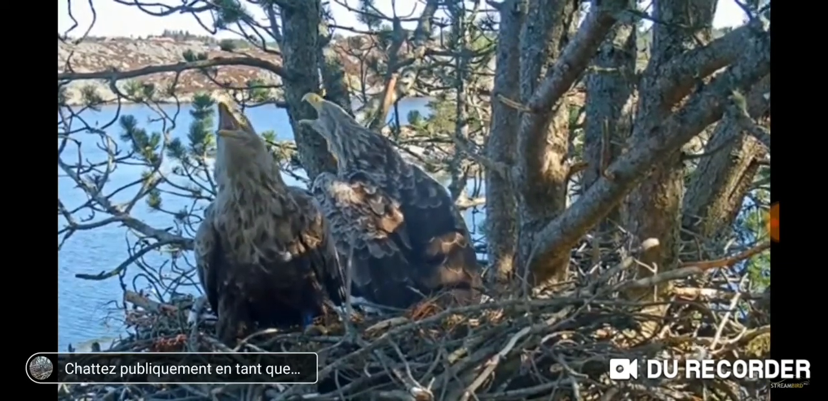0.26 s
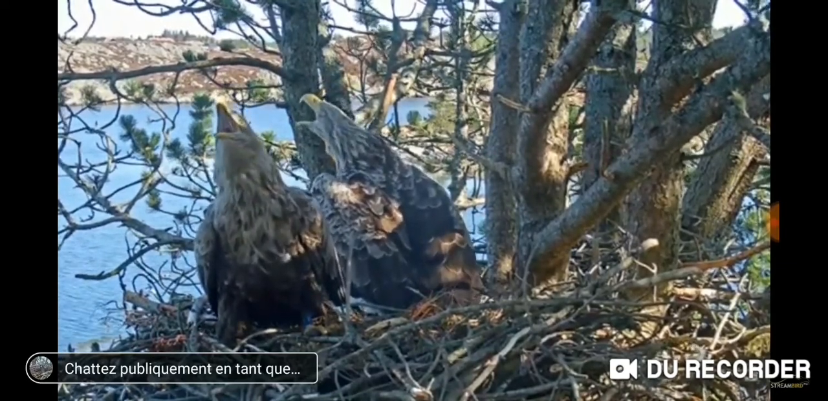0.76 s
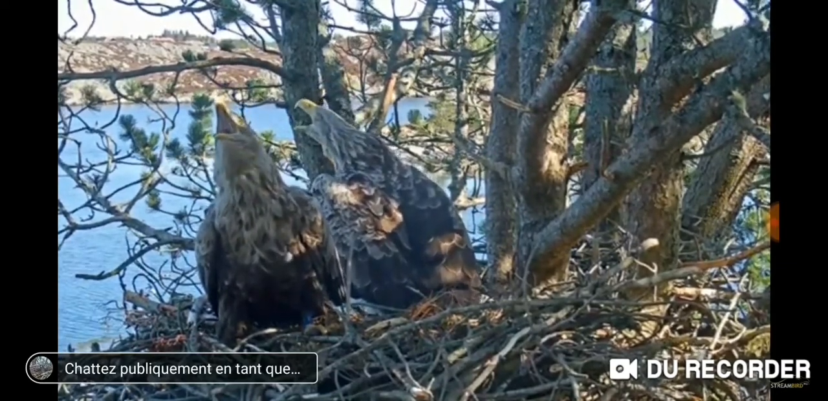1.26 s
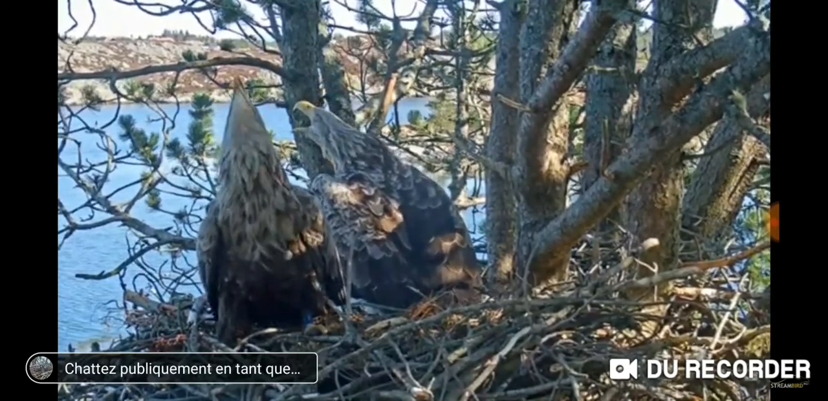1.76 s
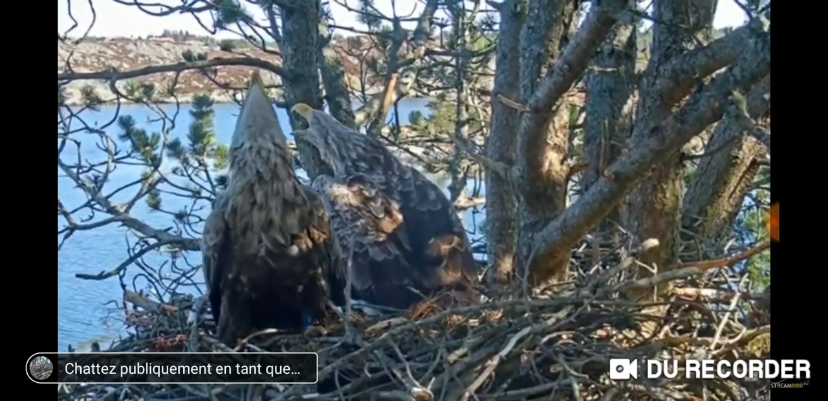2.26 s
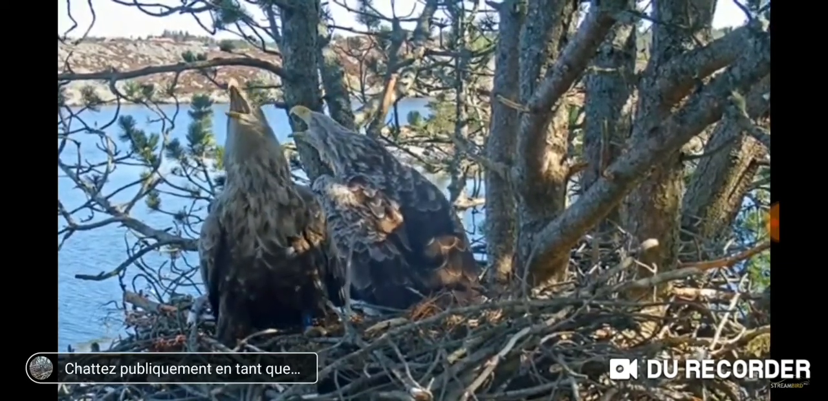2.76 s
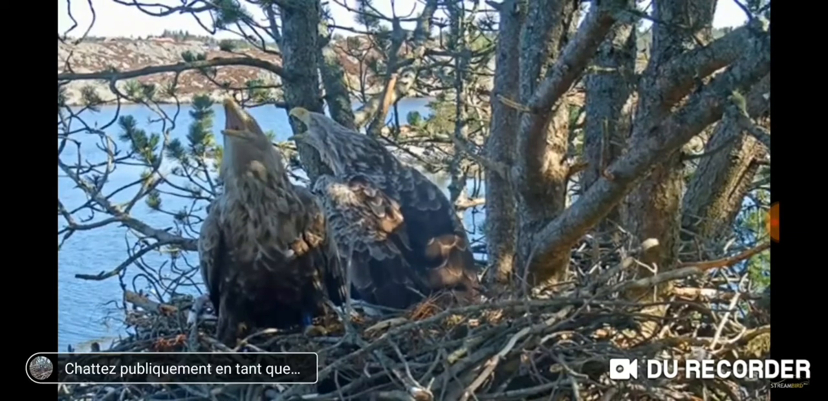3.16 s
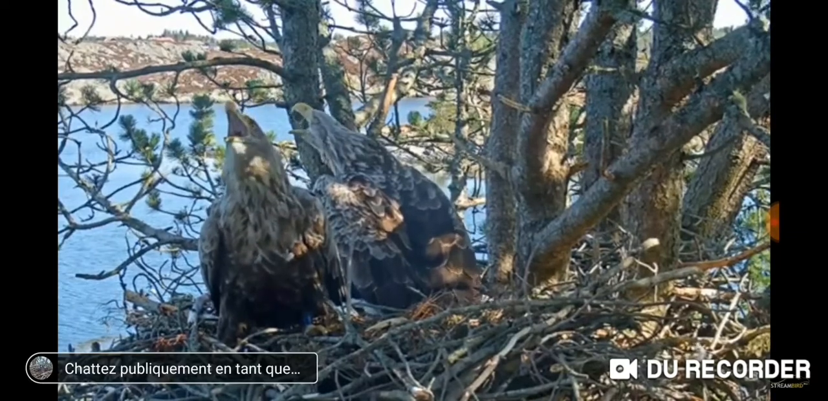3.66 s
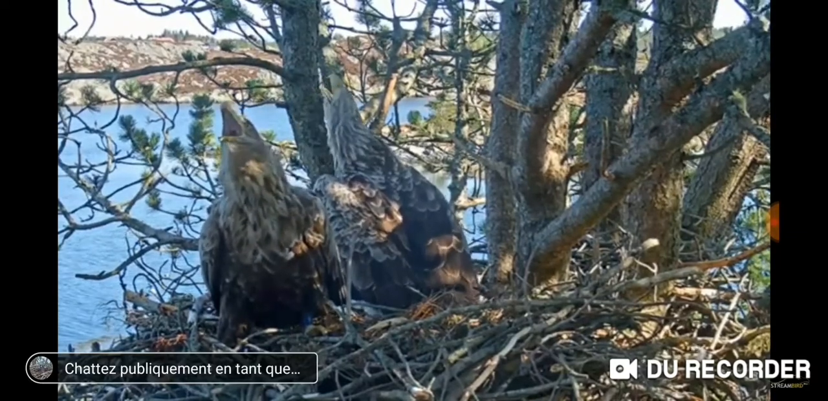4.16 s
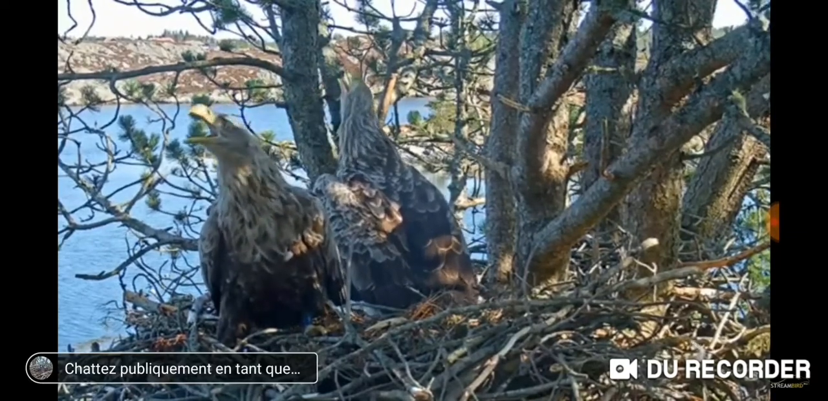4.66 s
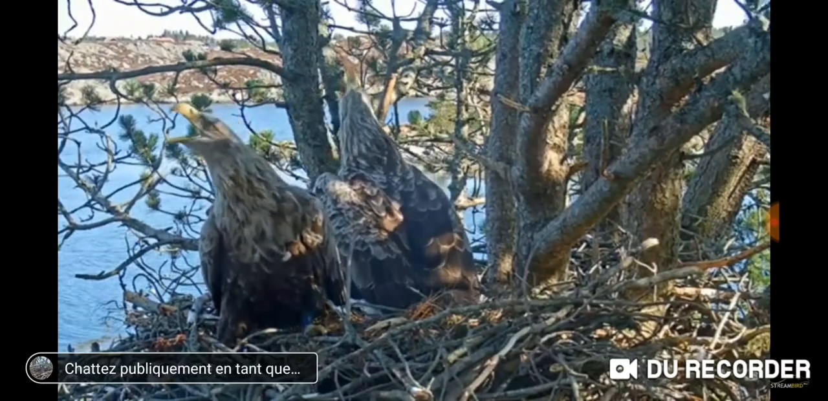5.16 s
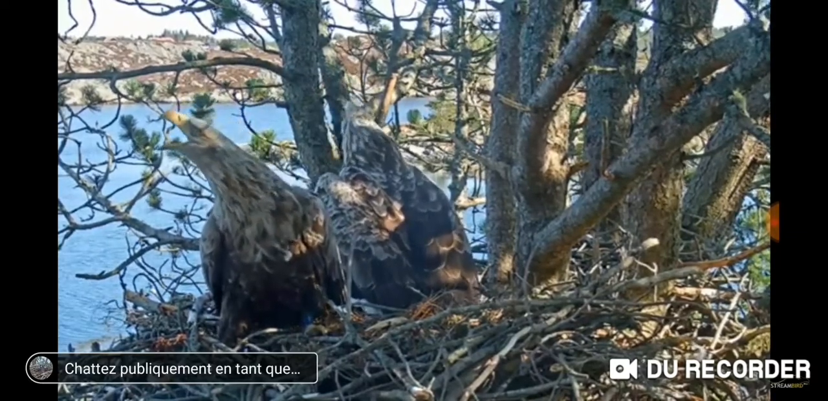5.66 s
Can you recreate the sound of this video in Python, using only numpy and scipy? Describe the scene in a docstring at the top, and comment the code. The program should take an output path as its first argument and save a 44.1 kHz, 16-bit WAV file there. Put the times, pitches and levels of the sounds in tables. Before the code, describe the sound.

Two eagles call from a nest outdoors for about six seconds without a pause. From the start, the nearer bird gives loud, high, short yelps, four or five a second, each gliding up and cracking into a shrill note. Its mate overlaps with softer, lower, slightly hoarse notes, about four a second. Around 1.7 to 2.3 seconds the near bird falters with shorter, weaker yelps, joined by tiny squeaks and two soft scrapes of feet on sticks. The yelps regain strength by 2.7 seconds. Faint croaks and squeaks slip in between 3.5 and 4.5 seconds, with slight stick scrapes from 4.1 to 4.8. After 4 seconds the mate's calls are more widely spaced and rougher; after 5 the near bird sounds slightly lower and weaker. A short echo from the trees follows each call. A faint low breeze and thin hiss lie underneath.

```python
"""Two eagles yelp in fast series on a nest among pines. Air shakes thin membranes in each bird's voice box.
The near bird's yelp starts low, glides up, then breaks into a high register; its mate answers softer
and lower. Short squeaks and croaks slip in between, and shifting feet scrape the sticks of the nest.
Tree trunks and a far shore echo it all, while a breeze hums over a faint hiss."""
import sys
import numpy as np
from scipy import signal
from scipy.fft import rfft, irfft, next_fast_len
from scipy.io import wavfile
from scipy.ndimage import uniform_filter1d, map_coordinates

SR = 44100
rng = np.random.default_rng(int(sys.argv[2]) if len(sys.argv) > 2 else 0)


def materialize(psi):
    """Save the field psi as 16-bit PCM at rate SR to the path in sys.argv[1].

    A 1-D psi becomes a single channel; in a 2-D psi each row is a channel.
    """
    bounded = np.clip(np.atleast_2d(psi).T, -1, 1)
    quanta = np.round(bounded * 32767).astype(np.int16)
    wavfile.write(sys.argv[1], SR, quanta)


N = 261060


def amp(db):
    """Turn decibels into a gain."""
    return 10 ** (np.asarray(db) / 20)


def at_hz(rows, hz):
    """Read a curve of (Hz, value) rows on a log frequency axis."""
    freqs, values = np.transpose(rows)
    return np.interp(np.log(hz + 1), np.log(freqs + 1), values)


def at_time(rows, s):
    """Read every column of a curve at s seconds."""
    times, *columns = np.transpose(rows)
    return [np.interp(s, times, column) for column in columns]


def wobble(rate, size=N):
    """A smooth random curve with `rate` new values a second."""
    return map_coordinates(rng.standard_normal(int(size * rate / SR) + 4), [np.arange(size) * rate / SR])


def filtered(x, gain_at):
    """Scale each frequency in x by gain_at(hz)."""
    size = next_fast_len(N + SR // 2)
    return irfft(rfft(x, size) * gain_at(np.fft.rfftfreq(size, 1 / SR)), size)[..., :N]


def noise(spectrum):
    """Noise shaped by (Hz, dB) rows, then scaled to an rms level of 1."""
    x = filtered(rng.standard_normal(N), lambda hz: amp(at_hz(spectrum, hz)))
    return x / np.sqrt(np.mean(x ** 2) + 1e-20)


# The wind's strength. Each row: time in seconds, level in dB.
WIND_LEVELS = [(0, -61), (.1, -55), (1.15, -69.5), (1.37, -54.5), (1.7, -65), (2.0, -56), (2.3, -65.5),
               (3.0, -55), (3.6, -63.5), (4.3, -67.5), (5.2, -70), (5.9, -65)]

def breeze():
    """Wind hums low in small gusts."""
    gusts = amp(at_time(WIND_LEVELS, np.arange(N) / SR)[0] + 2.5 * wobble(14))
    return gusts * noise([(30, -28), (60, -17), (150, 3), (300, -3.5), (600, -21.5), (20000, -88)])


# The near bird's yelps. Each row: start of the glide in seconds, lengths of lead-in, glide and hold
# in seconds, high pitch in Hz, lead-in level in dB, glide level in dB.
YELPS = [(0.045, 0.01022, 0.02253, 0.0374, 1796, -23.5, -12.5),
         (0.2706, 0.0152, 0.02145, 0.0348, 1819, -19.5, -12.5),
         (0.4881, 0.01293, 0.01976, 0.0338, 1808, -18.5, -12.5),
         (0.6979, 0.01405, 0.0167, 0.03745, 1814, -18.5, -13.5),
         (0.8874, 0.0093, 0.02406, 0.0258, 1801, -29, -13),
         (1.0771, 0.01012, 0.0227, 0.0287, 1800, -26, -13),
         (1.2736, 0.01192, 0.0231, 0.0388, 1787, -23.5, -13),
         (1.4875, 0.01313, 0.0198, 0.03466, 1815, -18.5, -13),
         (1.703, 0.0079, 0.00826, 0.0266, 1718, -20.5, -14.5),
         (1.983, 0.0032, 0.00995, 0.01347, 1659, -38.5, -17),
         (2.2694, 0.00732, 0.0449, 0.0131, 1779, -28, -16.5),
         (2.5085, 0.00755, 0.0062, 0.0453, 1722, -26, -13.5),
         (2.743, 0.01382, 0.0224, 0.0366, 1781, -19.5, -13.5),
         (2.9692, 0.0128, 0.0209, 0.0352, 1797, -19.5, -12.5),
         (3.207, 0.01594, 0.0276, 0.0341, 1789, -18, -12.5),
         (3.4311, 0.01292, 0.0298, 0.0327, 1801, -18.5, -12.5),
         (3.6455, 0.00988, 0.02463, 0.0336, 1808, -19.5, -12.5),
         (3.8611, 0.0147, 0.0246, 0.0243, 1814, -19.5, -12.5),
         (4.06, .015, 0.024, 0.026, 1805, -19.5, -12.5), (4.2517, 0.0101, 0.0263, 0.0279, 1796, -19.5, -13),
         (4.463, 0.0146, 0.02737, 0.0289, 1786, -20.5, -13.5),
         (4.669, 0.01292, 0.0269, 0.0326, 1783, -18, -14.5),
         (4.8723, 0.01594, 0.03465, 0.0213, 1784, -21.5, -14.5),
         (5.0777, 0.01098, 0.02926, 0.01225, 1785, -21, -15),
         (5.2654, 0.01313, 0.03986, 0.0226, 1554, -24.5, -16),
         (5.471, 0.01264, 0.0265, 0.0302, 1581, -21, -16),
         (5.68, 0.0118, 0.0235, 0.03185, 1615, -23.5, -16),
         (5.879, 0.0116, 0.0245, 0.0262, 1794, -19, -16.5)]
# It falters near 2 seconds and tires at the end. Each row: time in seconds, drop of the glide's start
# in Hz, sag of the hold in Hz, extra overtone slope in dB per octave, boost of the release in dB.
YELP_EFFORT = [(1.5, -4.5, 46, 4.5, 7.5), (1.7, 54.5, -109.5, 2, 5.5), (1.98, 151.5, 45.5, -2, 0.5),
               (2.27, -120, 147, 8.5, 3.5), (2.5, 59, 36, 1.5, 5), (2.74, 21, 33, 4.5, -1.5),
               (4.9, -7, 13, 3, 5), (5.08, 1, 30, 1.5, 13.5), (5.27, 0, 70, 0.5, 8)]

def near_yelps():
    """Notes that glide up, crack into a high register, hold there and fall away."""
    glide_from_hz, glide_hz_per_s, full_crack_hz = 1498.3, 3442, 190
    for start, lead, glide, hold, high, lead_db, glide_db in YELPS:
        drop, sag, bright_db, linger_db = at_time(YELP_EFFORT, start)
        low = glide_from_hz - drop
        top = min(low + glide_hz_per_s * glide, high)
        end = high - sag
        hold_db = -15.5 + 0.444 * (glide_db + 11.5)
        crack = np.clip((high - top) / full_crack_hz, 0, 1)  # a wider leap cracks harder
        jump = lead + glide
        stop = jump + hold
        points = [(0, 1020, lead_db - 10.5, -7),  # breathy lead-in
                  (.344 * lead, 1085, lead_db - 3, -15),
                  (lead - .0012, 1150, lead_db - .5, -15),
                  (lead, low, glide_db - 2, -15),  # glide
                  (lead + .00421, low, glide_db - 2, -26),
                  (jump - .0015, top, glide_db, -30),
                  (jump, (top + high) / 2, glide_db - 3.5 * crack, -24 + 7 * crack),  # break
                  (jump + .00155, high + 28.2 * crack, hold_db - .16, -26),
                  (jump + .381 * hold, high - .5 * crack * sag, hold_db, -32),  # hold
                  (stop - .003, end, hold_db, -28),
                  (stop + .00436, end * .93, hold_db - 18.5 + linger_db, -15),  # release
                  (stop + .02754, end * .68, hold_db - 50 + 2.466 * linger_db, -13)]
        # Louder yelps are brighter, and each is brightest at its break.
        from_break = np.abs(np.transpose(points)[0] - jump)
        dulling = 3.5 * np.clip(from_break / hold, 0, 1.5)
        overtone_db = .919 * glide_db + 11 - .213 * dulling
        slope_db = .8474 * hold_db + 8 + bright_db - dulling
        yield voice_box(start - lead, points, overtone_db, slope_db, hoarse=.065)


# The mate's answers. Each row: start of the hold in seconds, lengths of climb, hold and fall in seconds,
# held pitch in Hz, held level in dB.
ANSWERS = [(0.12, 0.0281, 0.0515, 0.005, 1416, -28), (0.363, 0.0311, 0.0552, 0.017, 1387, -27),
           (0.606, 0.0256, 0.0497, 0.0174, 1393, -27.5), (0.841, 0.0256, 0.0514, 0.00194, 1447, -23.5),
           (1.074, 0.0249, 0.0526, 0.00318, 1463, -22.5), (1.335, 0.0308, 0.0459, 0.004, 1429, -26.5),
           (1.586, 0.0301, 0.052, 0.0128, 1399, -26.5), (1.826, 0.02983, 0.0401, 0.0188, 1435, -24.5),
           (2.068, 0.0295, 0.0452, 0.0043, 1426, -23), (2.3, 0.0329, 0.0516, 0.0102, 1433, -23.5),
           (2.553, 0.0336, 0.0503, 0.0441, 1409, -25), (2.823, 0.0489, 0.0344, 0.0413, 1381, -25),
           (3.062, 0.03246, 0.0434, 0.045, 1397, -27), (3.306, 0.0347, 0.048, 0.0417, 1392, -26),
           (3.546, .035, .025, 0.018, 1426, -23.5), (3.767, 0.031, 0.01444, .02, 1433, -23),
           (4.327, 0.0207, 0.0187, 0.00163, 1250, -17), (4.672, 0.02214, 0.0232, 0.0076, 1279, -18.5),
           (5.008, 0.0308, 0.0301, 0.01246, 1396, -22), (5.28, 0.03275, 0.0372, 0.0225, 1371, -26),
           (5.605, 0.03744, 0.0574, 0.0261, 1382, -23.5), (5.847, 0.0262, 0.0452, 0.00408, 1229, -22)]
# Its brightness. Each row: time in seconds, overtone boost in dB, overtone slope in dB per octave.
ANSWER_OVERTONES = [(0, 0, -5), (1.3, -1, -4), (3.4, -4, -3), (4.33, -21.5, -17), (4.7, -5, -5),
                    (5.0, 0.5, -5.5), (5.3, -1.5, -2.5), (5.9, -7.5, -2)]
# It gets rougher as it tires. Each row: time in seconds, share of shake in the lowest harmonic.
ANSWER_HOARSENESS = [(0, .065), (4, .08), (5, .18), (5.4, .1)]

def mate_answers():
    """Lower notes that climb, break a little, hold and end in a ragged fall."""
    climb_db, fall_hz_per_s = -25, 2910
    for start, climb, hold, fall, high, hold_db in ANSWERS:
        stop = climb + hold
        below_break = .88 * high
        low = below_break - fall_hz_per_s * fall
        points = [(0, 880, climb_db - 33, -8),  # climb
                  (.005, 950, climb_db - 7.5, -15),
                  (climb - .0015, below_break, climb_db + 1, -17),
                  (climb + .00076, high, hold_db - 3, -17),  # hold
                  (climb + .321 * hold, high, hold_db, -32),
                  (stop, high, hold_db - .5, -28),
                  (stop + .0051, below_break, hold_db - 7.5, -13),  # fall
                  (stop + .00503 + fall, low, hold_db - 15, -11),
                  (stop + fall + .031, low, hold_db - 31.5, -9)]
        overtone_db, slope_db = at_time(ANSWER_OVERTONES, start)
        hoarse = at_time(ANSWER_HOARSENESS, start)[0]
        yield voice_box(start - climb, points, overtone_db, slope_db, hoarse)


# Squeaks and croaks. Each row: start and length in seconds, first and last pitch in Hz, level in dB,
# overtone boost in dB.
SHORT_CALLS = [(1.746, 0.00893, 2117, 2124, -21, 4), (1.794, 0.01254, 5730, 4786, -29, -20.5),
               (1.809, 0.00976, 2107, 2235, -21, 2.5), (2.055, 0.01535, 5429, 3880, -32, -17),
               (2.073, 0.013, 2114, 2173, -24, -0.5), (3.491, 0.019, 1389, 1369, -26.5, -28),
               (3.955, 0.022, 925.6, 893, -34.5, -33.5), (4.379, 0.059, 3880, 4476, -47.5, -6),
               (4.427, 0.0149, 2307, 1149, -28.5, -10)]

def squeaks():
    """Tiny hoarse notes, each a slightly arched sweep of pitch."""
    for start, length, first, last, db, overtone_db in SHORT_CALLS:
        points = [(0, first, db - 6.5, -8),
                  (.002, first, db + 1, -13),
                  (length / 2, (first + last) / 2 * 1.03, db, -15),
                  (length, last, db, -12),
                  (length + .003, last, db - 24, -8)]
        yield voice_box(start, points, overtone_db, slope_db=-3, hoarse=.15)


# How the throat colours the voice. Each row: frequency in Hz, gain in dB.
THROAT_GAINS = [(900, -2), (1500, 1.5), (2200, 4.5), (3000, -0.5), (3600, 0.5), (4400, -6.5), (5500, -6.5),
                (7200, -0.5), (12000, -11)]
TOP_HZ = 15700

def voice_box(start, points, overtone_db, slope_db, hoarse):
    """Vibrating membranes make one note: returns its place in the scene, its tone and its air flow."""
    # Each point: seconds into the note, pitch in Hz, level in dB, breath in dB relative to that level.
    times, hz, db, breath_db = np.transpose(points)
    first = round(start * SR)
    size = max(min(int(times[-1] * SR), N - first), 1)
    t = np.arange(size) / SR

    def follow(values):
        """Join one value per point with lines, or hold a single value."""
        return np.interp(t, times, np.broadcast_to(values, times.shape))

    breath = amp(follow(breath_db))
    waver = .00359 * wobble(91.5, size) + .00605 * wobble(187.1, size)
    pitch = follow(hz) * (1 + waver + .2188 * breath * wobble(705.54, size))
    phase = 2 * np.pi * np.cumsum(pitch) / SR
    k = np.arange(1, 11)[:, None]  # harmonic numbers
    colour_db = at_hz(THROAT_GAINS, k * pitch)
    colour_db += (k > 1) * (follow(overtone_db) + follow(slope_db) * np.log2(k / 2))
    colour_db += .15 * (follow(db) - db.max()) * np.log2(k)  # softer moments are duller
    colour_db -= 3.6 * breath * (k - 3)  # leaky membranes lose overtones
    gains = amp(colour_db) * (k * pitch < TOP_HZ)
    # Uneven membranes shake each harmonic in size and phase, most when it is high or breathy.
    shake = np.array([wobble(329.04, size) + 1j * wobble(333.8, size) for _ in k])
    rasp = np.clip((hoarse + breath) * k, 0, 1)
    roughness = np.sqrt(1 - rasp ** 2) + rasp * shake / np.sqrt(2)
    fade = np.clip(np.minimum(t, t[::-1]) / .002, 0, 1)
    level = amp(follow(db) + 1.5 * wobble(87.32, size)) * fade
    phase_spread = .45 * k * (k - 1)  # harmonics start out of step, so the tone is less spiky
    harmonics = gains * roughness * np.exp(1j * (k * phase + phase_spread))
    tone = np.sqrt(2) * level * harmonics.sum(axis=0).real
    flow = level * breath * (1 + 1.26 * np.sin(phase))  # air passes once a cycle
    return slice(first, first + size), tone, flow


# The hiss of swirling breath. Each row: frequency in Hz, relative level in dB.
BREATH_SPECTRUM = [(500, -9.5), (1000, -2.5), (1500, -28), (2300, -27), (3200, 28.5), (5000, 19.5),
                   (12000, -33.5)]

def eagles():
    """All the notes, with breath hissing most where the membranes start, break register and stop."""
    tones, airflow = np.zeros(N), np.zeros(N)
    for span, tone, flow in [*near_yelps(), *mate_answers(), *squeaks()]:
        tones[span] += tone
        airflow[span] += flow
    return tones + airflow * noise(BREATH_SPECTRUM)


# Foot movements. Each row: middle in seconds, spread in seconds, level in dB.
FOOT_SHUFFLES = [(1.859, 0.0123, -33.5), (2.128, 0.0113, -37.5), (4.14, 0.019, -44), (4.489, 0.0137, -40),
                 (4.798, 0.01192, -42.5)]
# The sound of the sticks. Each row: frequency in Hz, relative level in dB.
STICK_SPECTRUM = [(60, -26), (300, 6), (520, -0.5), (850, 16), (2000, -1), (8000, -25)]

def nest_scrapes():
    """Shifting feet make soft, lumpy scrapes among the sticks."""
    t = np.arange(N) / SR
    swells = sum(amp(db) * np.exp(-((t - middle) / spread) ** 2 / 2) for middle, spread, db in FOOT_SHUFFLES)
    lumps = amp(3.7 * wobble(90))
    return swells * lumps * noise(STICK_SPECTRUM)


# How long the trunks echo. Each row: frequency in Hz, seconds to fade by 60 dB.
TRUNK_FADE_TIMES = [(500, 0.24), (1500, 0.166), (3000, 0.257), (7000, 0.137), (12000, 0.1238)]

def echoes(x):
    """Trunks scatter the sound; the far shore adds a fainter, longer tail."""
    shore_db, shore_fade_s, build_s, flicker = -25, .914, .00343, .45
    out, step = np.zeros(N + SR), SR // 8
    x = x * (np.sqrt(1 - flicker ** 2) + flicker * wobble(70))  # moving needles make echoes flicker
    for first in range(-step, N, step):  # each stretch meets a new scatter as the heads move
        hz, t, scatter = signal.stft(rng.standard_normal(SR // 2), SR, nperseg=256)
        trunks = amp(-60 * t / at_hz(TRUNK_FADE_TIMES, hz)[:, None])
        shore = amp(shore_db - 60 * t / shore_fade_s)
        tail = signal.istft(scatter * (trunks + shore), SR, nperseg=256)[1]
        tail *= 1 - np.exp(-np.arange(len(tail)) / SR / build_s)
        span = np.arange(max(first, 0), min(first + 2 * step, N))
        stretch = x[span] * np.sin(np.pi * (span - first) / (2 * step))
        echo = signal.fftconvolve(stretch, tail / np.linalg.norm(tail))
        out[span[0]:span[0] + len(echo)] += echo
    return out[:N]


def scene():
    """Birds and nest with their echoes, in the breeze, on one channel."""
    close = eagles() + nest_scrapes()
    return (close + amp(-11.5) * echoes(close) + breeze())[None]


# A dull microphone. Each row: frequency in Hz, gain in dB.
MIC_GAINS = [(3700, -1), (4200, -6), (7300, -8), (8300, -27.5), (10000, -33), (11300, -11), (12000, -35),
             (12600, -44), (14500, -42), (15500, -60)]
# The background hiss. Each row: frequency in Hz, relative level in dB.
HISS_SPECTRUM = [(20, -33.5), (50, -23), (85, -32.5), (600, -12.5), (1500, 1.5), (4000, -35), (7000, -17.5),
                 (9000, -29), (11300, -20), (12300, -42.5), (12900, -72)]

def record(dry):
    """A fast limiter holds down the loudest moments, the microphone dulls them, and hiss lies under all."""
    power = uniform_filter1d(uniform_filter1d(dry ** 2, 60), 60)
    level = np.sqrt(np.abs(power))
    limited = dry / (1 + (level / .5) ** 4) ** (1 / 4)
    dulled = filtered(limited, lambda hz: amp(at_hz(MIC_GAINS, hz)))
    hiss = amp(-49.5 + 1.2 * wobble(3)) * noise(HISS_SPECTRUM)
    return filtered(dulled + hiss, lambda hz: (hz < TOP_HZ) * (hz > 12))


dry = scene()
out = record(dry)
materialize(out)
```